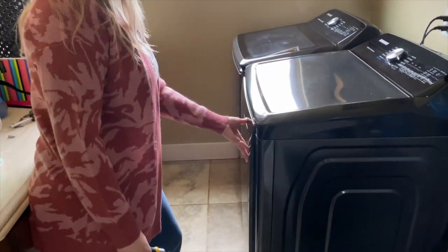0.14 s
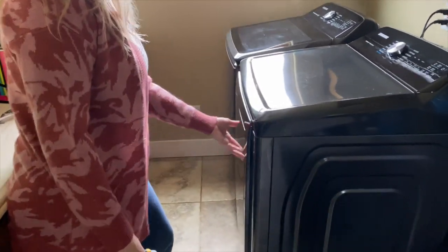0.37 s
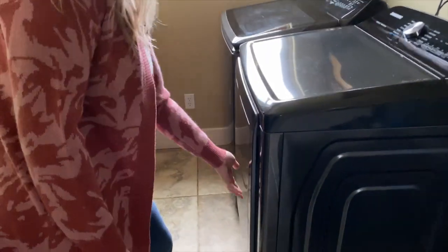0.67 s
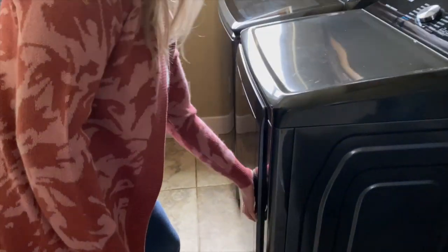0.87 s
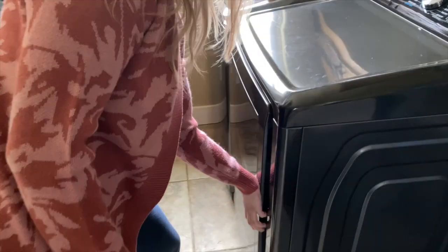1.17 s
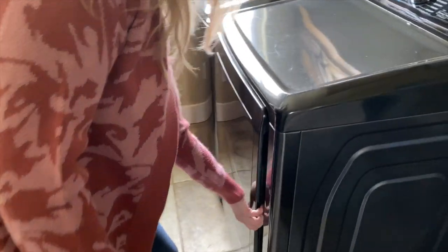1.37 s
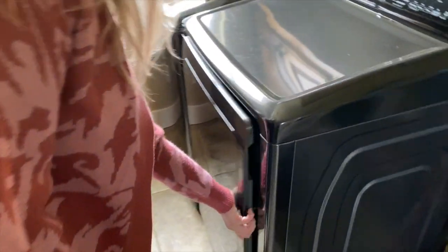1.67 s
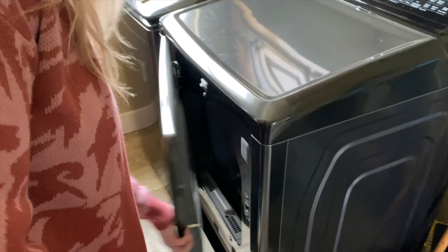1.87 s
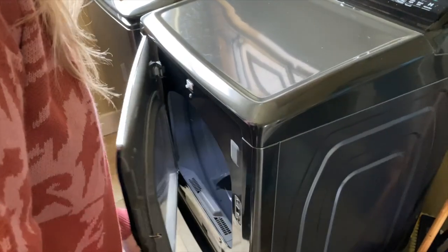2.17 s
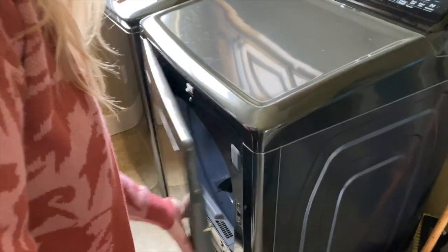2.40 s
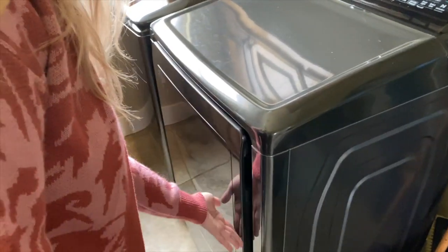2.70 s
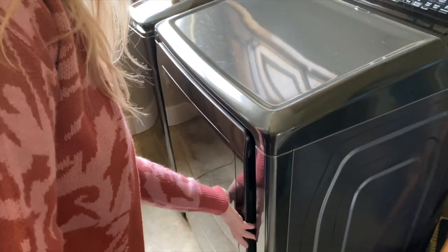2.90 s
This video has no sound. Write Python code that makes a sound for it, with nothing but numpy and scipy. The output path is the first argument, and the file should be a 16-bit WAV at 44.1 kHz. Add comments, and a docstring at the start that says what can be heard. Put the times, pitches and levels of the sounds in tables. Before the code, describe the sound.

After soft footsteps, a washing machine door clicks open and knocks shut.

```python
"""Feet step and scuff in a small tiled laundry room; then a washing machine door is pulled and shut.
The latch snaps in quick clicks that ring the door; the door's blows boom the sheet-steel cabinet.
Heel, hand and door seal add soft thuds. The room smears clicks, blows and footwork over faint house rumble.
A phone with two microphone ports listens from about a metre."""
import sys
import numpy as np
from scipy import signal
from scipy.fft import rfft, irfft, next_fast_len
from scipy.io import wavfile

SR = 44100
rng = np.random.default_rng(int(sys.argv[2]) if len(sys.argv) > 2 else 0)


def put_to_file(sound):
    """Save the sound as 16-bit audio at rate SR, in the file named by the first command-line argument."""
    columns = np.atleast_2d(sound).T  # one column per channel
    safe = np.clip(columns, -1, 1)
    whole_steps = np.round(safe * 32767)
    wavfile.write(sys.argv[1], SR, whole_steps.astype(np.int16))


N = 134505

# footfalls and toe taps (time [s], level [dB], low cut [Hz], high cut [Hz])
STEPS = [(0.0, 1, 29.4, 265), (0.09, 4, 29.5, 211), (.141, 12.5, 113, 263), (0.171, 11.5, 30.4, 212),
         (0.539, -7.5, 45.5, 108), (.647, -19.5, 695, 985), (.872, -3.5, 49.8, 149.5),
         (0.988, -5.5, 50, 165.4), (1.44, -12.5, 51.8, 145.7)]
# friction strokes (peak time [s], rise [s], fall [s], level [dB], low cut [Hz], high cut [Hz])
SCUFFS = [(-.005, 0.09, 0.073, -42.5, 154, 1200), (0.106, 0.0073, 0.01, -52, 2500, 12200),
          (0.145, 0.022, 0.029, -35, 192, 11100), (.46, 0.072, 0.073, -56, 486, 870),
          (.71, 0.012, 0.31, -61, 1310, 2400), (1.016, 0.055, 0.028, -51, 450, 3800),
          (1.229, 0.02, 0.075, -52, 1800, 6500), (1.299, 0.056, 0.03, -36, 49.2, 54.9),
          (1.46, 0.085, 0.039, -56.5, 400, 9470), (1.654, 0.065, 0.051, -51.5, 400, 1176),
          (2.089, 0.087, 0.062, -52, 200, 11270)]
# friction spectrum (frequency [Hz], gain [dB])
SCUFF_EQ = [(50, 10), (150, 12.5), (350, 1), (700, 2.5), (1500, -0.5), (3500, 0.5), (5500, -1.5), (7000, 4),
            (8800, -4.5), (12000, 5), (16000, 6)]
# house noise spectrum (frequency [Hz], relative level [dB])
HOUSE_EQ = [(15, -37), (25, -2), (153, -11.5), (185, -9.5), (335, -20.5), (659, -25.5), (1290, -30),
            (1840, -28.5), (2690, -32.5), (16000, -42)]
# latch and handle clicks (time [s], level [dB], high cut [Hz], action [nudge/pull/shut])
CLICKS = [(0.103, -27.5, 14000, "nudge"), (0.14, -16, 14100, "nudge"), (.695, -29, 1720, "nudge"),
          (1.7101, -2.5, 14060, "pull"), (1.721, -2.5, 12000, "pull"), (1.7337, -1.5, 2437, "pull"),
          (1.747, -8.5, 1202, "pull"), (2.576, -2.5, 9900, "shut"), (2.589, -0.5, 4800, "shut"),
          (2.606, -2, 3730, "shut"), (3.031, -32.5, 11900, "nudge")]
# click spectrum (frequency [Hz], gain [dB])
LATCH_EQ = [(60, -27.5), (250, -18), (600, 3), (1200, 6), (1900, 5.5), (2600, 1), (3500, 4.5), (5000, 3),
            (8000, -1.5), (12000, -0.5), (16000, 7)]
# handle modes (frequency [Hz], T60 [s], level [dB])
HANDLE_MODES = [(559, 0.15, 2.7), (3360, 0.52, 3.6), (7250, .3, 2)]
# door panel modes (frequency [Hz], T60 [s], level pulled [dB], level shut [dB])
DOOR_MODES = [(526.3, 0.57, -9.5, 2), (620, .35, -2, -8.5), (749, 0.55, -2, -13), (870, 0.6, -1, -3.5),
              (928, 0.27, 0.5, -6), (1071, 0.47, 2.5, -6), (1184, 0.17, 1.5, -3.5), (1343, .3, -4.5, 2),
              (1470, .33, -2.5, -1), (1700, 0.4, -0.5, -1), (1835, 0.31, 0.5, 2.5), (2120, 0.18, -4.5, 0),
              (2260, 0.25, -12.5, -1), (2680, .32, -8, 4), (2870, 0.54, -11.5, 1), (3076, 0.44, -6.5, 2.5),
              (3264, .34, -1, 3.5), (4916, .22, 6, 1.5)]
# cushioned contacts (time [s], frequency [Hz], level [dB], length [s])
THUDS = [(0.141, 59, -35, 0.07), (0.875, 168.4, -44.5, 0.057), (1.741, 258, -26, 0.02),
         (2.593, 76.2, -21.5, 0.077), (2.594, 150.4, -21, 0.025), (2.588, 235.6, -24.5, 0.089)]
# door blows on the cabinet (time [s], level [dB], low cut [Hz], high cut [Hz])
BLOWS = [(1.712, 6.5, 154, 1300), (1.736, 13, 156, 320), (2.583, 11.5, 146, 360), (2.592, 17, 143, 265),
         (2.6, 17.5, 6.5, 130), (2.615, 18, 156, 232)]
# steel cabinet modes (frequency [Hz], T60 [s], level [dB])
CABINET_MODES = [(75.5, 1, 2), (103.1, 0.96, 2), (164.8, 1, -2.5), (239.7, 0.86, 3), (374, 0.31, -9)]
# room decay (frequency [Hz], T60 [s])
ROOM_T60 = [(60, 1), (150, 0.66), (400, 0.66), (1000, 0.61), (2500, 0.46), (5000, 0.48), (9000, 0.24),
            (15000, 0.18)]
# tone of the final sound (frequency [Hz], gain [dB]): deepest bass thinned, lows lifted, and the high treble #
# dips near 13 kHz
FINAL_EQ = [(20, -18.5), (50, 6.5), (11000, -0.5), (13000, -7), (16000, -4)]

PORT_GAP_M, PORT_LAG_S, BALANCE_DB = 0.3, 0.00047, 0.62
BUILD_S, DIRECT_DB = 0.001, -8.5
GRAIN_SPREAD_DB, GRAIN_SAMPLES = 4.5, 64
SNAP_DB, SNAP_LOW_CUT_HZ, SNAP_DECAY_S = -16, 7000, 0.0013
DOOR_RING_DB, CABINET_RING_DB, HOUSE_DB = -5.52, -20.5, -66.5
MODE_SCATTER, MODE_WIDTH_HZ = 0.007, 7.26


def undb(db):
    """Decibels to gain."""
    return 10 ** (np.asarray(db) / 20)


def along(points, hz):
    """Interpolate (Hz, value) points over log frequency."""
    point_hz, values = np.array(points, float).T
    return np.interp(np.log(hz + 1), np.log(point_hz), values)


def equalise(x, points):
    """Minimum-phase filter through (Hz, dB) points."""
    size = 2 * next_fast_len(x.shape[-1])
    gain = undb(along(points, np.fft.rfftfreq(size, 1 / SR)))
    cepstrum = irfft(np.log(gain))
    cepstrum[1:size // 2] *= 2
    cepstrum[size // 2 + 1:] = 0
    return irfft(rfft(x, size) * np.exp(rfft(cepstrum)))[..., :x.shape[-1]]


def butter(x, hz, kind, order=2):
    """Butterworth low-pass or high-pass."""
    return signal.sosfilt(signal.butter(order, hz, kind, fs=SR, output="sos"), x)


def band(x, low_hz, high_hz, order=2):
    """High-pass, then low-pass."""
    return butter(butter(x, low_hz, "high", order), high_hz, "low", order)


def add(out, x, start_s):
    """Mix x in at start_s."""
    i = int(start_s * SR)
    out[:, i:i + x.shape[-1]] += x[:, :N - i]


def diffuse(size):
    """Noise from all sides at two ports: alike in the bass, unrelated in the treble."""
    hz = np.fft.rfftfreq(size, 1 / SR)
    coherence = 0.96 * np.sinc(2 * hz * PORT_GAP_M / 343)
    phasors = np.exp(2j * np.pi * rng.random((2, len(hz))))
    mid, side = phasors * np.sqrt([1 + coherence, 1 - coherence])
    return irfft(np.array([mid + side, mid - side]), size) * np.sqrt(size / 2)


def room(wet_db):
    """1 s impulse response: direct sound, then a dense tail whose treble dies first."""
    t, hz = np.arange(SR) / SR, np.fft.rfftfreq(SR, 1 / SR)
    centres_hz = np.geomspace(60, 15000, 7)
    spectrum, tail = rfft(diffuse(SR)), 0
    for centre_hz, weights in zip(centres_hz, np.eye(len(centres_hz))):
        noise = irfft(spectrum * along(np.c_[centres_hz, weights], hz))
        tail += noise * undb(-60 * t / along(ROOM_T60, centre_hz))
    tail *= 1 - np.exp(-t / BUILD_S)
    response = undb(wet_db) * tail / np.sqrt(np.sum(tail ** 2) / 2)
    response[0, 0] += undb(DIRECT_DB)
    response[1, int(PORT_LAG_S * SR)] += undb(DIRECT_DB)
    return response


def steps():
    """Dull footfalls on tile excite the room."""
    out = np.zeros((2, N))
    for time_s, db, low_hz, high_hz in STEPS:
        add(out, undb(db) * band(room(wet_db=-1.5), low_hz, high_hz), time_s)
    return out


def scuffs():
    """Grainy friction of soles, hand and cloth; each stroke swells and fades into the room."""
    t, friction = np.arange(-SR, N) / SR, 0  # 1 s lead-in: the first stroke is already under way
    for peak_s, rise_s, fall_s, db, low_hz, high_hz in SCUFFS:
        noise = rng.standard_normal(len(t))
        grain_db = GRAIN_SPREAD_DB * rng.standard_normal(len(t) // GRAIN_SAMPLES + 1)
        grains = noise * undb(np.repeat(grain_db, GRAIN_SAMPLES)[:len(t)])
        stroke = np.exp(-((t - peak_s) / np.where(t < peak_s, rise_s, fall_s)) ** 2)
        friction += undb(db) * stroke * band(grains / grains.std(), low_hz, high_hz, order=1)
    friction = equalise(friction, SCUFF_EQ)
    return signal.fftconvolve(friction[None], room(wet_db=0.5), axes=1)[:, SR:SR + N]


def house_noise():
    """Faint, steady, diffuse rumble and hiss."""
    noise = equalise(diffuse(N), HOUSE_EQ)
    return undb(HOUSE_DB) * noise / noise.std()


def ring(modes):
    """Decaying modes of a loose part: pitch scatters from blow to blow, phase wanders."""
    t, out = np.arange(SR) / SR, 0
    for hz, t60_s, db in modes:
        lag_s = PORT_LAG_S * rng.uniform(-0.93, 1, (2, 1))
        pitch_hz = hz * (1 + MODE_SCATTER * rng.uniform(-1, 1))
        wander_rad = np.cumsum(rng.standard_normal(SR)) * np.sqrt(2 * np.pi * MODE_WIDTH_HZ / SR)
        out += undb(db - 60 * t / t60_s) * np.sin(2 * np.pi * pitch_hz * (t - lag_s) + wander_rad)
    return out * (1 - np.exp(-t / BUILD_S)) / np.sqrt(SR / 20)


def latch():
    """Hard clicks: the plastic hook's dry snap, the ring of handle or door, the room's response."""
    out, t = np.zeros((2, N)), np.arange(SR) / SR
    modes = {"nudge": HANDLE_MODES,
             "pull": [(hz, t60_s, db) for hz, t60_s, db, _ in DOOR_MODES],
             "shut": [(hz, t60_s, db) for hz, t60_s, _, db in DOOR_MODES]}
    for time_s, db, high_hz, action in CLICKS:
        burst = diffuse(SR) * np.exp(-t / SNAP_DECAY_S)
        snap = undb(SNAP_DB) * butter(burst, SNAP_LOW_CUT_HZ, "high")
        click = snap + room(wet_db=6.5) + undb(DOOR_RING_DB) * ring(modes[action])
        add(out, undb(db) * butter(click, high_hz, "low", order=1), time_s)
    return equalise(out, LATCH_EQ)


def thuds():
    """Heel, hand or door seal drives one low resonance that briefly swells and dies."""
    out = 0
    for time_s, hz, db, length_s in THUDS:
        t = np.arange(N) / SR - time_s
        swell = np.sin(np.pi * np.clip(t / length_s, 0, 1))
        out += undb(db) * swell * np.sin(2 * np.pi * hz * t)
    return out


def cabinet():
    """The door jerks free or lands on its seal; the steel box booms."""
    out = np.zeros((2, N))
    for time_s, db, low_hz, high_hz in BLOWS:
        boom = room(wet_db=5) + undb(CABINET_RING_DB) * ring(CABINET_MODES)
        add(out, undb(db) * band(boom, low_hz, high_hz), time_s)
    return out


def scene():
    """Door, feet and house noise, slightly louder on the left."""
    mix = latch() + cabinet() + steps() + thuds() + scuffs() + house_noise()
    return mix * undb([[BALANCE_DB / 2], [-BALANCE_DB / 2]])


def record(dry):
    """Final tone: deepest bass thinned, lows lifted, the high treble dipping near 13 kHz, top cut."""
    top_cut = signal.ellip(8, 0.2, 70, 15900, fs=SR, output="sos")
    return signal.sosfilt(top_cut, equalise(dry, FINAL_EQ))


dry = scene()
out = record(dry)
put_to_file(out)
```